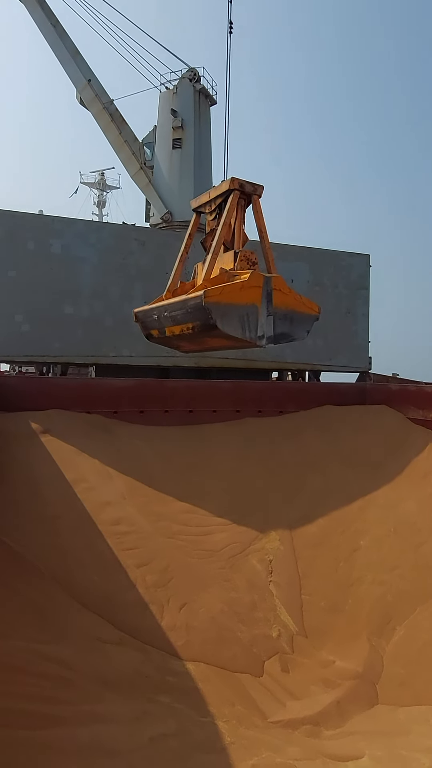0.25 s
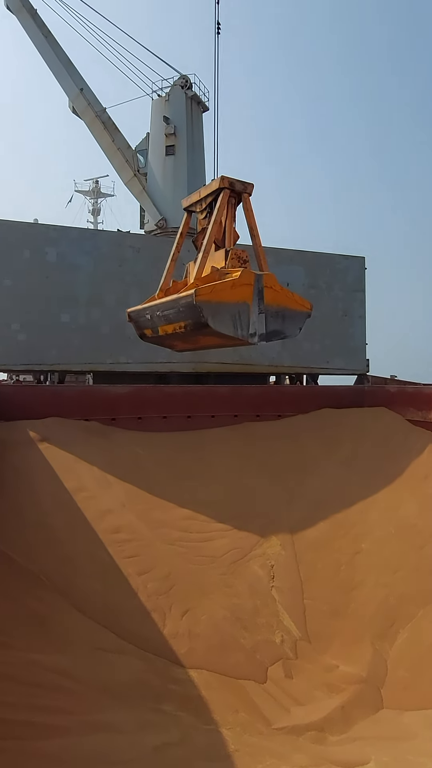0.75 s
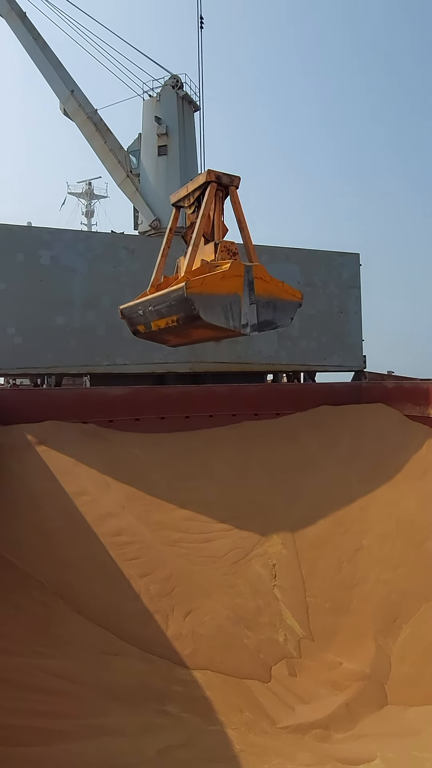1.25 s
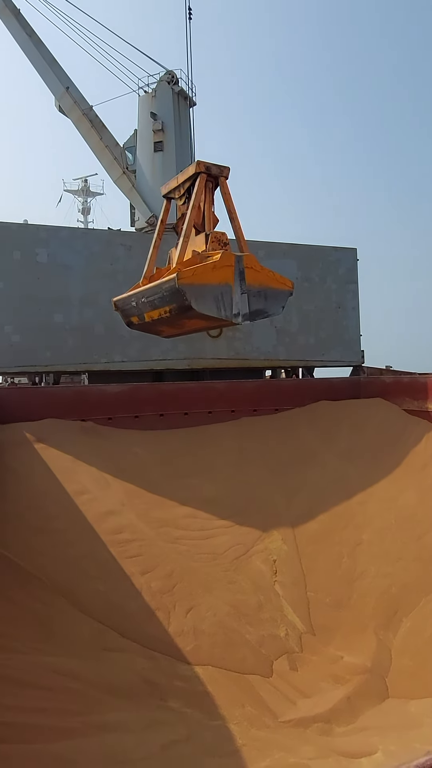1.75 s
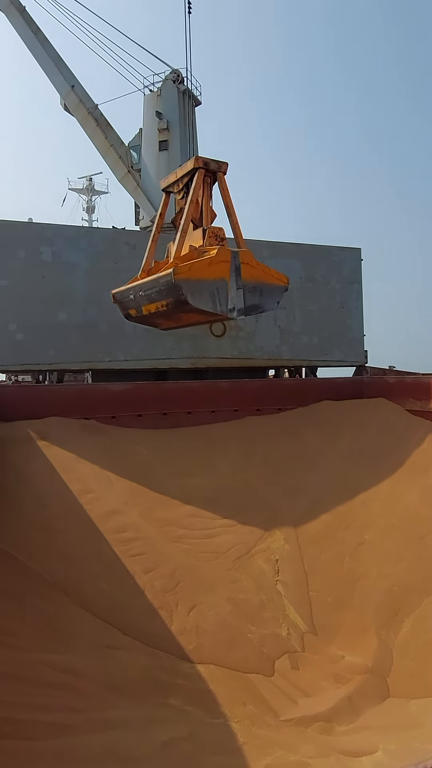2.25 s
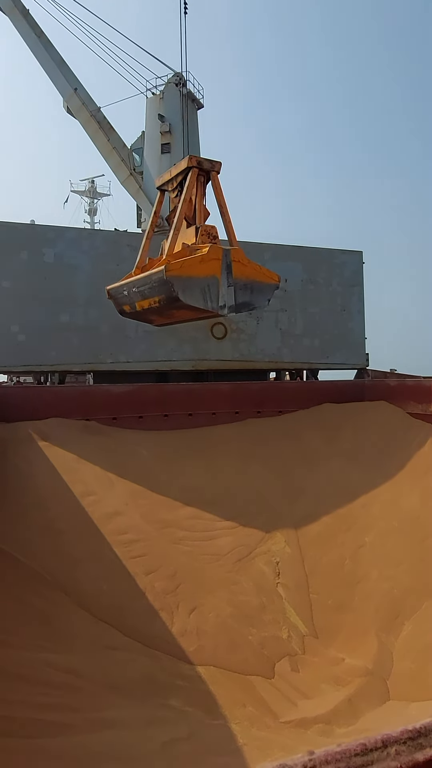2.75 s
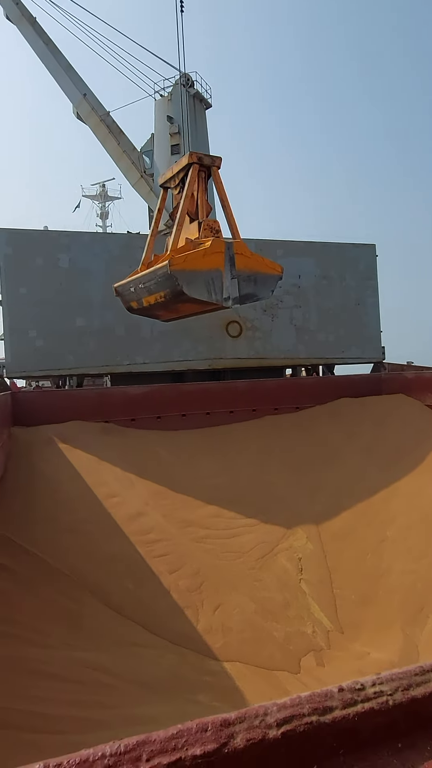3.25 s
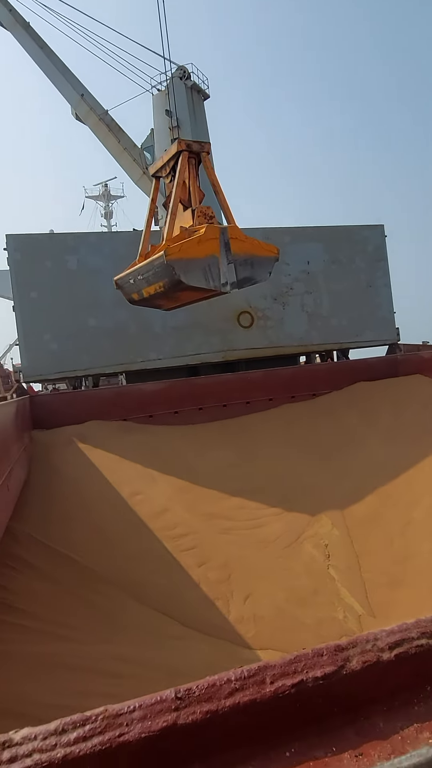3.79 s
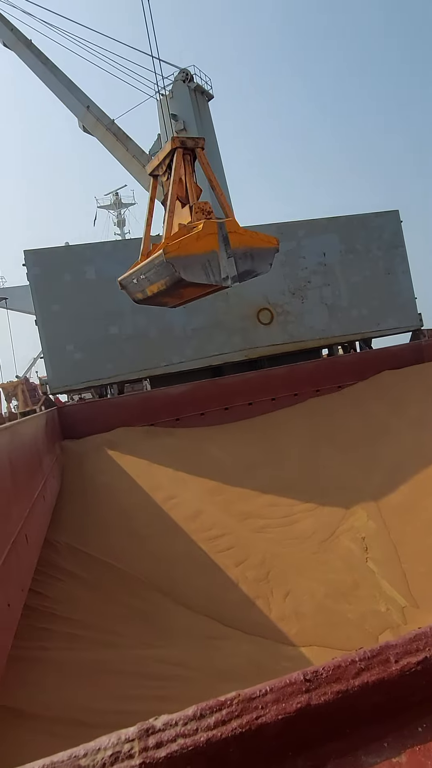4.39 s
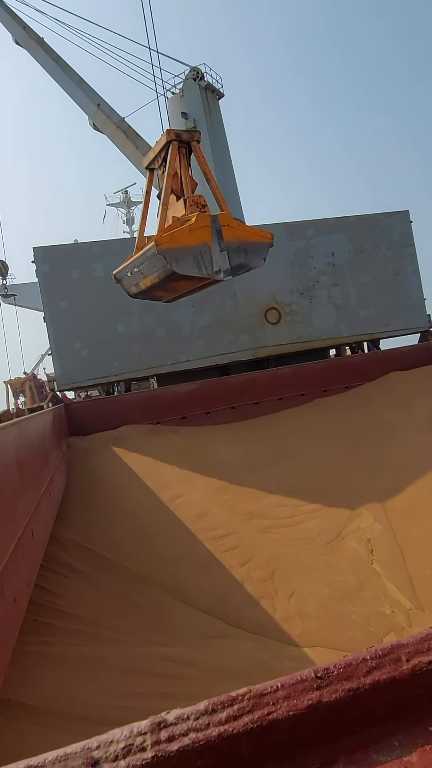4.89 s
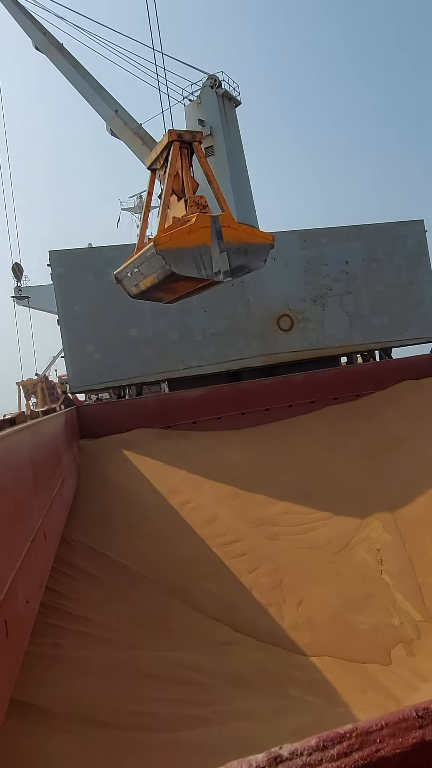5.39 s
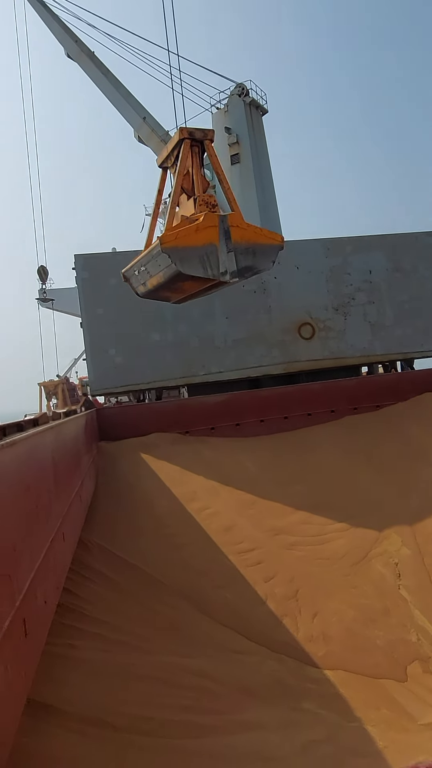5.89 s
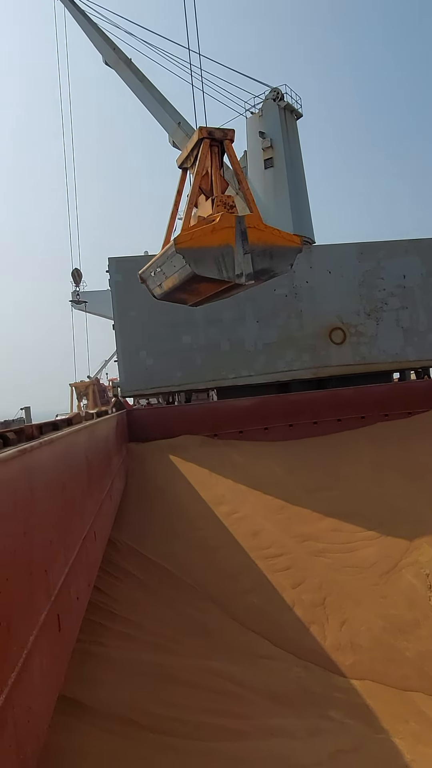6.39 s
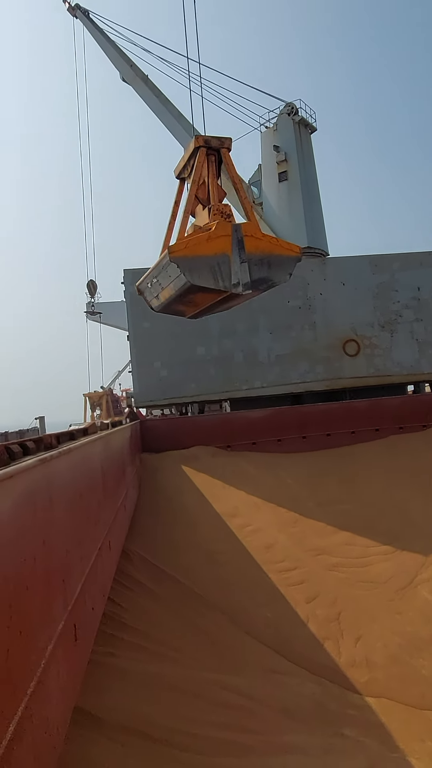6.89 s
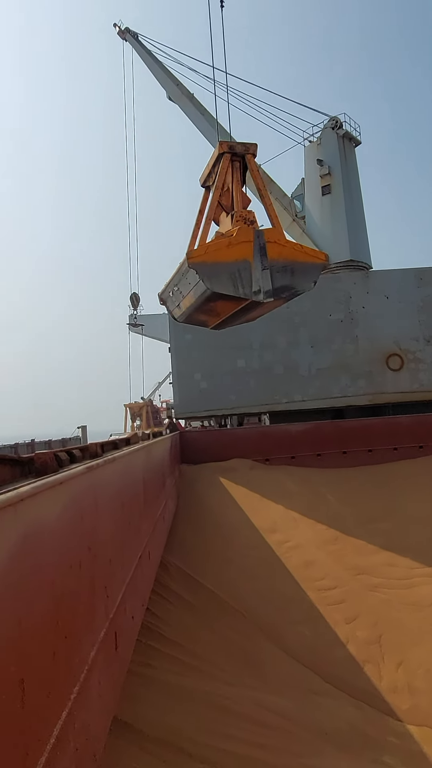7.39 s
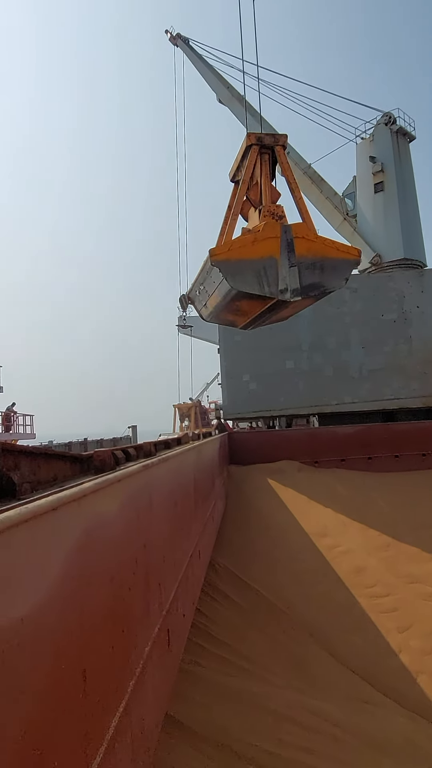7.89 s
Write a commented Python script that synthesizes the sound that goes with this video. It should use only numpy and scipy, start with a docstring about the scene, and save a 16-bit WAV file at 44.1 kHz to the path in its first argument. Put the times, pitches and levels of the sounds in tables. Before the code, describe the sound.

Strong low-mid machine hum with a thin fluttering whine, engine roar and oil hiss; late on, the hum drops back and turns unsteady.

```python
"""Crane pump across a ship's hold

A deck crane's hydraulic pump hums across a steel cargo hold while the crane lifts, then starts to slew.
Piston overtones fade as the paths off the steel shift; the winch and ship's machines add lower tones.
Shaped noise makes the engine rumble and roar, oil hiss, fizz and short surges; passing tones and tiny ticks
come late."""
import sys
import numpy as np
from scipy import signal
from scipy.fft import rfft, irfft, next_fast_len
from scipy.io import wavfile
from scipy.ndimage import uniform_filter1d, map_coordinates

SR = 44100
rng = np.random.default_rng(int(sys.argv[2]) if len(sys.argv) > 2 else 0)


def wrap_up_sound(samples):
    """Save the sound to the file named by the first command line argument, as 16-bit audio."""
    columns = np.atleast_2d(samples).T
    # keep every value between -1 and 1, then stretch to whole-number steps
    tamed = np.clip(columns, -1, 1)
    steps = np.round(tamed * 32767).astype(np.int16)
    wavfile.write(sys.argv[1], SR, steps)


N = 358959  # length in samples


def amp(db):
    """dB to gain."""
    return 10 ** (np.asarray(db) / 20)


def unit(x):
    """x at rms 1."""
    return x / np.sqrt(np.mean(np.abs(x) ** 2) + 1e-20)


def seconds():
    """The time of every sample."""
    return np.arange(N) / SR


def along(points, hz):
    """Values at hz, read from (Hz, value) points on a log frequency axis."""
    point_hz, value = np.transpose(points)
    return np.interp(np.log(hz + 1), np.log(point_hz + 1), value)


def curves(rows):
    """One value per sample for each column after the time."""
    s, *columns = np.transpose(rows)
    return [np.interp(seconds(), s, column) for column in columns]


def glide(start, end):
    """A straight line from start to end over the whole scene."""
    t = seconds()
    return start + (end - start) * t / t[-1]


def bump(x, centre, half):
    """A bell curve of height 1 that falls to 1/e at half either side of centre."""
    return np.exp(-((x - centre) / half) ** 2)


def wobble(rate):
    """A smooth random curve; rate (knots a second) may change in time."""
    step = 32  # samples between computed points
    if np.isscalar(rate):
        rates = np.abs(rate) * np.ones(N // step + 2)
    else:
        rates = np.abs(rate[::step])
    knot = np.cumsum(rates) * step / SR
    slow = map_coordinates(rng.standard_normal(200), [np.clip(knot, 0, 198)])
    return np.interp(np.arange(N) / step, np.arange(len(slow)), slow)


def fading(rate, scatter, phase=None):
    """Complex gain of one direct path (phase in rad, else random) plus many drifting reflections."""
    if phase is None:
        phase = 2 * np.pi * rng.random()
    reflections = wobble(rate) + 1j * wobble(rate)
    return unit(np.exp(1j * phase) + scatter * reflections)


def tone(cycles, db):
    """A complex tone whose real part has the given rms level."""
    return np.sqrt(2) * amp(db) * np.exp(2j * np.pi * cycles)


def ports(centre, side):
    """Left and right microphone ports from a centre and an off-centre part."""
    return np.real([centre + side, centre - side])


def filtered(x, response):
    """x times a response of frequency."""
    m = next_fast_len(N + 8192)
    return irfft(rfft(x, m) * response(np.fft.rfftfreq(m, 1 / SR)), m)[..., :N]


# How alike noise is at the two ports. Each row: frequency in Hz, left-right correlation (0-1).
LIKENESS = [(35, .8), (60, .93), (130, .96), (250, .75), (400, .3), (640, 0)]


def rush(spectrum, patchy_db):
    """Stereo noise of rms 1: shaped by spectrum, with smooth random patches of gain in time and pitch."""
    grains = signal.stft(rng.standard_normal((2, N)), nperseg=512)[2]
    field = uniform_filter1d(rng.standard_normal(grains.shape[1:]), 6, 0)
    field = uniform_filter1d(field, 14, 1)
    patchy = signal.istft(grains * amp(patchy_db * unit(field)), nperseg=512)[1][:, :N]

    def shape(hz):
        # splitting mid and side by this angle gives the wanted correlation
        angle = np.arccos(np.clip(along(LIKENESS, hz), -1, 1)) / 2
        return amp(along(spectrum, hz)) * [np.cos(angle), np.sin(angle)]

    mid, side = filtered(patchy, shape)
    return unit(np.array([mid + side, mid - side]))


# Pump speed. Each row: time in seconds, piston rate in Hz.
PISTON_RATE = [(0, 271.1), (.7, 271.0), (1.1, 270.7), (2.7, 270.75), (3.2, 270.35), (3.8, 270.7),
               (5.4, 270.6), (5.85, 270.1), (6.2, 270.3), (6.62, 269.3), (7.1, 272.5), (8.14, 272.3)]


def piston_cycles():
    """Running count of piston strokes, the shared phase of all pump tones."""
    hz, = curves(PISTON_RATE)
    return np.cumsum(hz) / SR + 1 / 3


# Pump fundamental. Each row: time in seconds, left level in dB, right level in dB, left's phase lead in rad.
FUNDAMENTAL = [(0, -14, -16.5, 0), (.6, -11.5, -14.4, 0.12), (1.6, -13, -15, 0.3), (1.92, -15, -20, -0.2),
               (2.2, -12, -14, 0.2), (3.45, -13.5, -18.5, .5), (3.75, -14.5, -29, 1.9), (4, -19, -19, 1.5),
               (5.3, -16.5, -18.5, 2.5), (5.9, -30.5, -16.5, 2.5), (6.15, -21.5, -11.5, 1),
               (6.6, -21, -19.5, 0.25), (6.95, -30, -23.5, 1.2), (7.2, -25, -27, 0), (8.14, -21, -24.5, 0)]


def pump_hum(cycles):
    """The strong tone at the piston rate, with its own level and phase at each port."""
    left_db, right_db, lead = curves(FUNDAMENTAL)
    left = tone(cycles, left_db) * np.exp(.5j * lead)
    right = tone(cycles, right_db) * np.exp(-.5j * lead)
    return np.real([left, right])


# How the crane's motion stirs the overtones. Each row: time in seconds, base fading rate in knots a second,
# off-centre gain of the 2nd and 3rd in dB, gain of the upper and faint overtones in dB.
MOTION = [(0, 1.09, -1, 1.5), (5.3, 1.333, 1.5, 2.5), (5.8, 3.9, -2, 4), (6.6, 6.03, 2, 1.5),
          (6.9, 6.06, 7.5, -4), (8.14, 5, 7.5, -3.5)]
# Overtones that carry the whine. Each row: multiple of the piston rate, centre level between swells in dB,
# off-centre level at start and at end in dB (all before the motion gains),
# off-centre phase in rad (0 leans left, 3 right).
WHINE = [(2, -43, -33, -33, .5), (3, -48, -47.5, -44.5, .8), (4, -50, -36, -52, .8),
         (5, -51, -50, -45, 2.5), (6, -52.5, -47.5, -46.5, 2.2), (7, -52.5, -42.5, -42.5, 2.4),
         (8, -54, -50.5, -51, 2.6)]
# Moments when the paths of an overtone add up. Each row: multiple of the piston rate, centre in seconds,
# half length to 1/e in seconds, peak centre level in dB before flutter.
PATH_SWELLS = [(2, 0.25, 0.35, -37.5), (2, 1.33, .7, -38.5), (2, 3.6, .25, -40.5), (2, 5.41, 0.71, -36),
               (2, 6.13, 0.11, -33), (2, 6.59, .22, -26.5), (2, 7.134, 0.35, -25.5), (2, 7.98, 0.19, -26),
               (3, 0.63, 0.31, -39), (3, 1.88, 1.3, -36), (3, 4.21, 0.41, -37.5), (3, 5.34, 0.53, -34),
               (3, 6.2, 0.09, -39.5), (3, 6.87, 0.13, -31), (3, 7.42, 0.1, -44), (4, 3.36, 0.26, -45.5),
               (4, 4.5, 0.38, -44), (4, 5.214, 0.43, -42), (4, 6.35, .15, -43.5), (4, 6.68, 0.039, -39.5),
               (4, 7.08, .11, -44), (4, 7.48, 0.2, -45.5), (5, 1.18, 0.95, -42.5), (5, 4.05, 0.38, -43),
               (5, 5.15, 0.35, -44.5), (5, 6.86, .1, -46.5), (6, .65, .3, -48), (6, 2.0, 0.36, -49),
               (6, 3.92, .45, -42), (6, 5.19, 0.26, -39), (7, 0.18, 0.4, -35), (7, 0.76, .2, -45),
               (7, 2.37, 0.2, -38), (7, 3.42, 0.11, -41.5), (7, 4.05, .4, -45.5), (7, 4.87, 0.3, -42.5),
               (7, 5.53, 0.19, -38.5), (7, 5.85, 0.051, -41), (7, 6.09, 0.06, -39.5), (7, 6.49, 0.1, -42),
               (7, 6.76, 0.08, -42.5), (7, 7.78, 0.12, -45), (8, 2.3, 0.64, -49.5), (8, 3.1, 0.088, -49),
               (8, 3.93, 0.11, -49), (8, 5.1, 0.11, -52), (8, 6.55, .15, -49)]


def pump_overtones(cycles):
    """Piston overtones that fade by interference, faster once the crane slews."""
    t = seconds()
    rate, low_side_gain_db, upper_gain_db = curves(MOTION)
    out = np.zeros((2, N))
    for k, centre_db, start_db, end_db, phase in WHINE:
        # the 4th takes no motion gain; the 2nd and 3rd take theirs off-centre only
        gain_db = low_side_gain_db if k < 4 else upper_gain_db * (k > 4)
        swells = sum(amp(db) * bump(t, s, half) for j, s, half, db in PATH_SWELLS if j == k)
        between = amp(centre_db + gain_db * (k > 3))
        between = between * np.abs(fading(1.5 * rate, scatter=.24 + .15 * rate))
        side = amp(glide(start_db, end_db) + gain_db) * fading(rate, scatter=.63, phase=phase)
        # quick path changes grow with motion
        flutter = fading(1.3 * rate + 2.5, scatter=.03 * rate, phase=0)
        wave = tone(k * cycles + rng.random(), 0)
        out += ports(wave * (between + swells) * flutter, wave * side)
    return out


# Weaker overtones. Each row: multiple of the piston rate, level at each port in dB before the motion gain.
FAINT_OVERTONES = [(9, -58), (10, -56.5), (11, -62.5), (12, -67.5), (13, -70), (14, -69), (15, -65.5),
                   (17, -69), (19, -69.5)]
# Tones of uneven pistons. Each row: multiple of the shaft rate, level at each port in dB before the motion gain.
SHAFT_TONES = [(24, -55.5), (26, -59), (31, -60)]
STROKES_PER_TURN = 5


def pump_faint_tones(cycles):
    """Weak high overtones, and shaft tones from uneven pistons, fading separately at each port."""
    rate, _, upper_gain_db = curves(MOTION)
    shaft = [(turns / STROKES_PER_TURN, db) for turns, db in SHAFT_TONES]
    out = np.zeros((2, N))
    for k, db in [*FAINT_OVERTONES, *shaft]:
        wave = tone(k * cycles, db + upper_gain_db)
        out += np.real([wave * fading(2.2 * rate, scatter=2.5) for port in range(2)])
    return out


def pump():
    """Piston pulses: fundamental, whine and faint tones locked to one stroke count."""
    cycles = piston_cycles()
    return pump_hum(cycles) + pump_overtones(cycles) + pump_faint_tones(cycles)


# Winch fan and gear tones. Each row: frequency in Hz, centre level and off-centre level in dB before hoist gain.
WINCH_TONES = [(110.2, -35, -56), (165.3, -35.5, -56), (220.4, -36, -49), (85.75, -45, -65),
               (257.1, -31, -43), (429, -46, -57), (686, -53, -55)]
# The hoist at work, then easing off. Each row: time in seconds, winch gain in dB.
HOIST_GAIN = [(0, -2), (4, 1.5), (5.9, 1.5), (6.3, -10), (8.14, -12)]


def winch():
    """Slightly unsteady fan and gear tones that sink as the hoist eases off."""
    t = seconds()
    hoist_db, = curves(HOIST_GAIN)
    out = np.zeros((2, N))
    for hz, db, side_db in WINCH_TONES:
        centre = tone(hz * t, db) * fading(1.6, scatter=.22)
        side = tone(hz * t + rng.random(), side_db)
        out += amp(hoist_db) * ports(centre, side)
    return out


# The ship's own machines. Each row: frequency in Hz, centre level at start and at end in dB,
# off-centre level in dB, unsteadiness (scatter relative to the direct path).
SHIP_TONES = [(70.6, -30.5, -38.5, -50, 0.12), (147, -42, -35.5, -65, 1.2), (241.5, -47.5, -35, -47.5, .9)]


def ship_machines():
    """Low tones of the ship's generators; the more unsteady ones also waver faster."""
    t = seconds()
    out = np.zeros((2, N))
    for hz, start_db, end_db, side_db, unsteady in SHIP_TONES:
        centre = tone(hz * t, glide(start_db, end_db)) * fading(6 * unsteady, unsteady)
        out += ports(centre, tone(hz * t + rng.random(), side_db))
    return out


# Engine and fan levels. Each row: time in seconds, rumble level in dB, roar level in dB.
ENGINE_LEVELS = [(0, -26.5, -32), (3.5, -30.5, -33), (4.8, -26.5, -31.5), (5.7, -26, -30),
                 (6.5, -24.5, -30), (7, -26, -31), (7.8, -23.5, -30)]
# Colour of the rumble. Each row: frequency in Hz, relative density in dB per Hz.
RUMBLE_COLOUR = [(20, -13.5), (38, -17), (56, -2.5), (95, -1), (138, 3.5), (185, -2), (240, 7.5),
                 (320, 0.5), (450, -20), (900, -64)]
# Colour of the roar. Each row: frequency in Hz, relative density in dB per Hz.
ROAR_COLOUR = [(200, -28.5), (350, -2.5), (480, -2.5), (750, -9.5), (1100, -15), (1800, -21.5),
               (3000, -47.5)]


def engines():
    """Rumble and roar of fans and engines, as two bands of patchy noise."""
    rumble_db, roar_db = curves(ENGINE_LEVELS)
    rumble = amp(rumble_db) * rush(RUMBLE_COLOUR, patchy_db=1.17)
    roar = amp(roar_db) * rush(ROAR_COLOUR, patchy_db=1.5)
    return rumble + roar


# Oil flow through the valves. Each row: time in seconds, hiss level in dB before the left-right lean.
OIL_LEVEL = [(0, -45), (2.75, -45.5), (3.05, -42), (3.5, -45), (4.2, -43), (5.3, -41.5), (5.65, -38.5),
             (6.05, -39), (6.5, -37.5), (7, -40.5), (7.5, -43.5), (8.14, -42.5)]
# Colour of the hiss. Each row: frequency in Hz, relative density in dB per Hz.
HISS_COLOUR = [(900, -28), (1500, -5), (2100, 0), (2600, -7), (3300, -11), (4500, -13.5), (6000, -22),
               (8000, -45), (16000, -80)]
# Colour of the fizz. Each row: frequency in Hz, relative density in dB per Hz.
FIZZ_COLOUR = [(3500, -22), (5500, 1), (7800, 2), (8600, -4.5), (10500, -2.5), (12000, 0), (14000, -3.5),
               (15700, -6)]
FIZZ_MEAN_DB, FIZZ_SWING = -55.5, 1.52  # mean level before the lean; dB of swing per dB of hiss swing


def oil():
    """Hiss of oil through valves, with a thin fizz on top that follows it in wider swings."""
    hiss_db, = curves(OIL_LEVEL)
    fizz_db = FIZZ_MEAN_DB + FIZZ_SWING * (hiss_db - hiss_db.mean())
    hiss = amp(hiss_db) * rush(HISS_COLOUR, patchy_db=1.2)
    fizz = amp(fizz_db) * rush(FIZZ_COLOUR, patchy_db=1)
    lean_db = np.array([[-.7], [.7]])  # a little to the right
    return amp(lean_db) * (hiss + fizz)


# Tones heard for a while. Each row: frequency in Hz, start in seconds, end in seconds, level in dB.
PASSING_TONES = [(265.5, 6.65, 8.3, -28.5), (326, 4.95, 6.15, -37), (312, 4.95, 6.2, -39)]


def passing_tones():
    """Wavering tones that fade in over 0.15 s; the quieter pair fade out again, the 265.5 Hz one holds to the end."""
    t = seconds()
    out = np.zeros((2, N))
    for hz, start, end, db in PASSING_TONES:
        gate = np.clip(np.minimum(t - start, end - t) / .15, 0, 1)
        out += gate * np.real(tone(hz * t, db) * fading(3, scatter=.3))
    return out


# Swells of hiss. Each row: centre in seconds, half length to 1/e in seconds, band centre in Hz,
# half width to 1/e in Hz, peak level in dB.
HISS_SURGES = [(6.7, .2, 2130, 260, -42), (5.74, .17, 7200, 900, -56), (7.2, .25, 7300, 800, -63)]


def surges():
    """Short swells of hiss, each noise in its own bell-shaped band."""
    t = seconds()
    out = np.zeros((2, N))
    for s, half, hz, width_hz, db in HISS_SURGES:
        band = unit(filtered(rng.standard_normal((2, N)), lambda f: bump(f, hz, width_hz)))
        out += amp(db) * bump(t, s, half) * band
    return out


# Ticks near the microphone. Each row: centre in seconds, peak level in dB before panning,
# left minus right in dB, frequency in Hz.
TICK_HITS = [(7.4878, -47, -4.5, 12600), (7.5028, -46, -9, 13200), (7.5157, -36, -14, 14200),
             (7.5565, -48, 2, 14300), (7.605, -43, -5, 14600), (7.671, -41, -9, 15000)]


def ticks():
    """Tiny very high ticks, each a few cycles under a bell-shaped envelope."""
    out = np.zeros((2, N))
    reach = 40  # samples either side of the peak
    t = np.arange(-reach, reach + 1) / SR
    for s, db, pan_db, hz in TICK_HITS:
        click = np.cos(2 * np.pi * hz * t) * bump(t, 0, .00022)
        gains = amp(db + np.array([[pan_db / 2], [-pan_db / 2]]))
        first = round(s * SR) - reach
        out[:, first:first + len(t)] += gains * click
    return out


def scene():
    """All sources at the two microphone ports."""
    tones = pump() + winch() + ship_machines()
    noise = engines() + oil()
    return tones + noise + passing_tones() + surges() + ticks()


TOP_HZ = 15750


def record(dry):
    """The camera's band limit: a steep low-pass, run both ways so that it adds no delay."""
    steep = signal.ellip(14, .1, 60, TOP_HZ, fs=SR, output="sos")
    return signal.sosfiltfilt(steep, dry)


dry = scene()
out = record(dry)
wrap_up_sound(out)
```